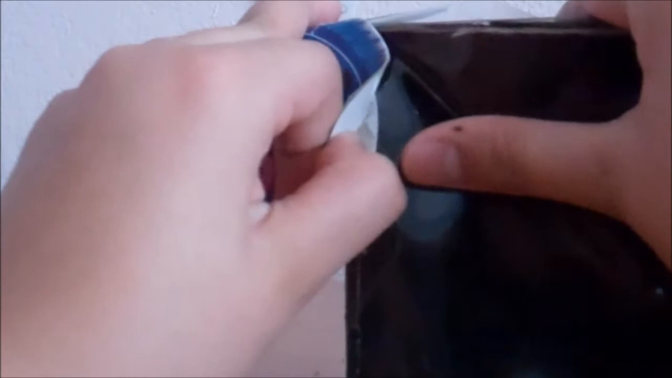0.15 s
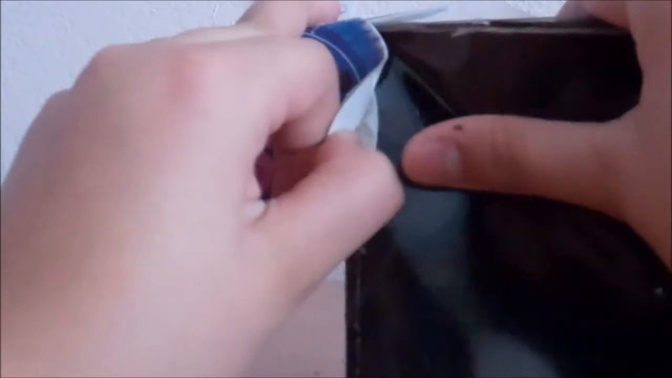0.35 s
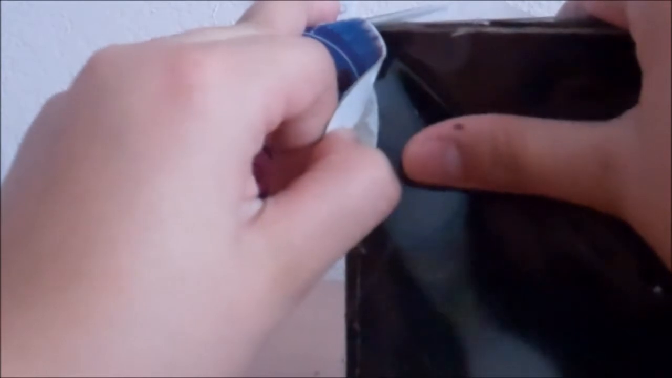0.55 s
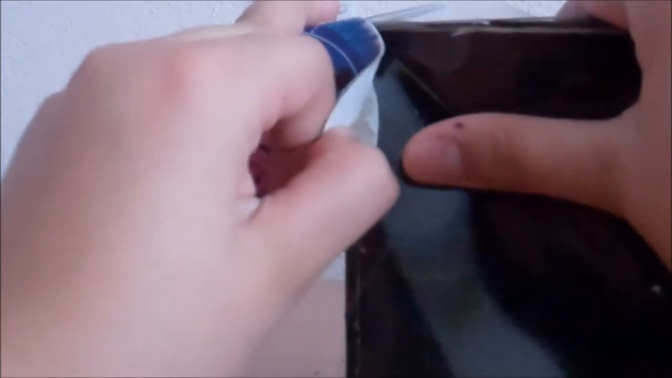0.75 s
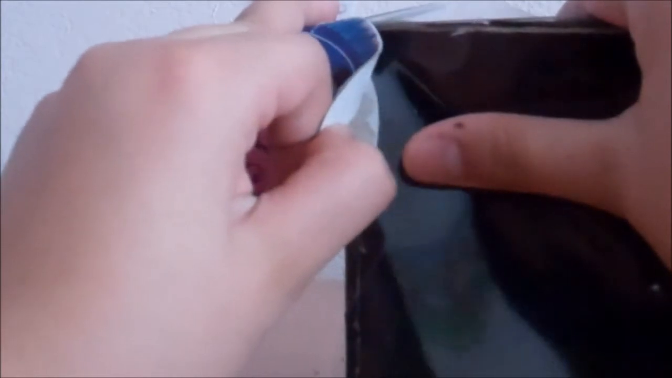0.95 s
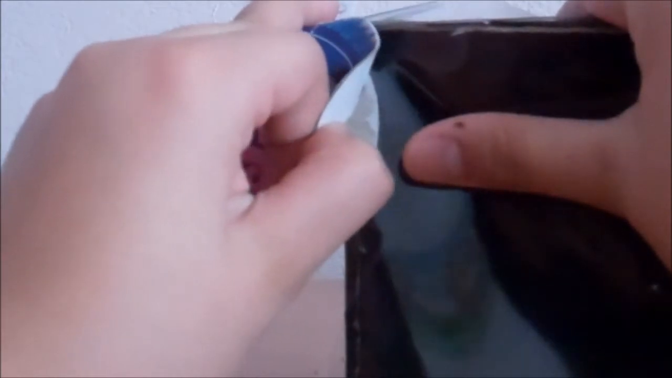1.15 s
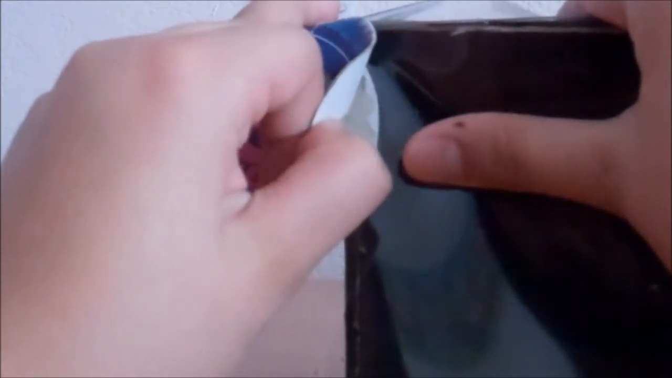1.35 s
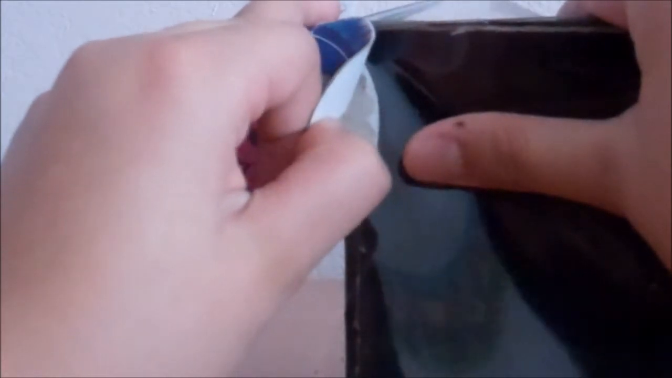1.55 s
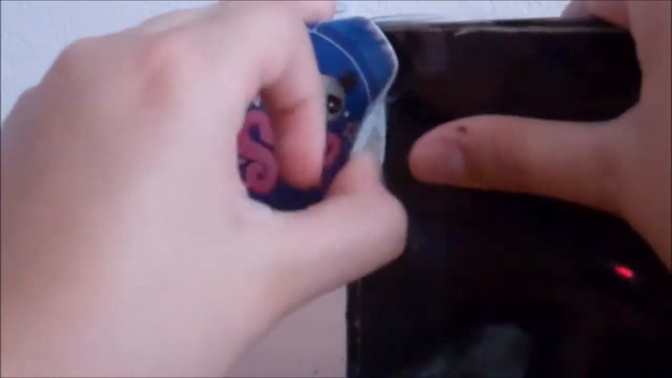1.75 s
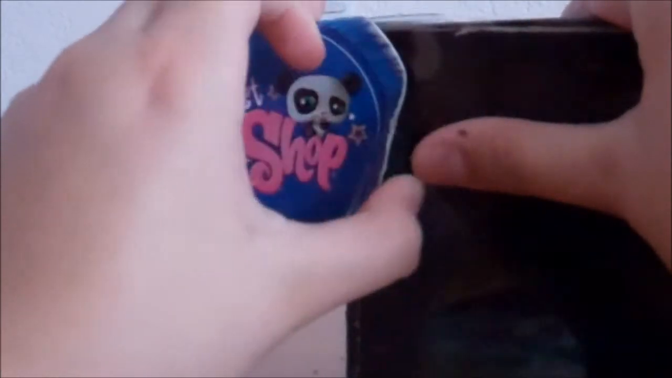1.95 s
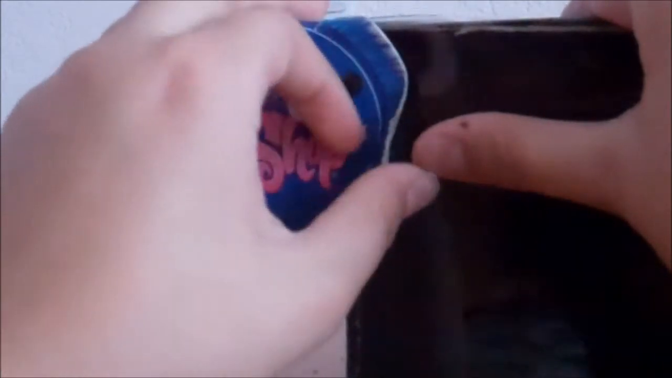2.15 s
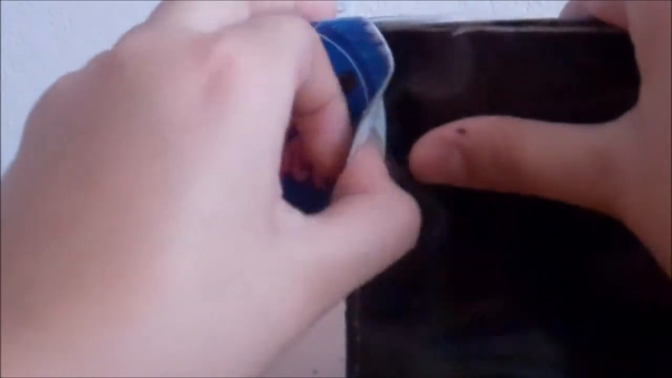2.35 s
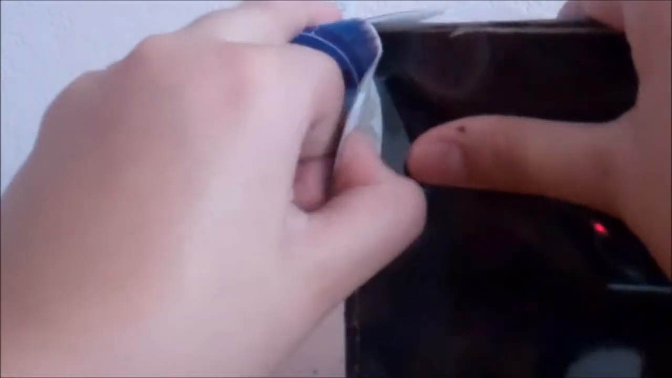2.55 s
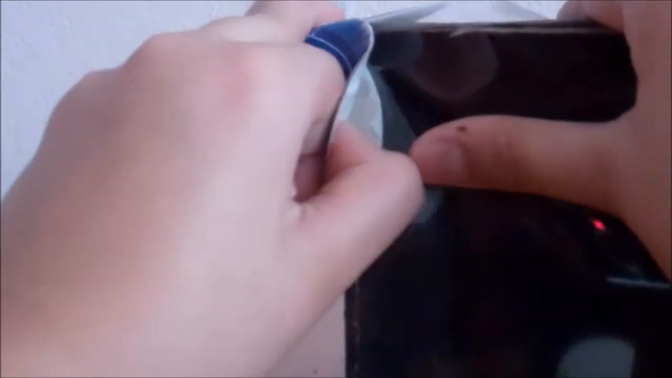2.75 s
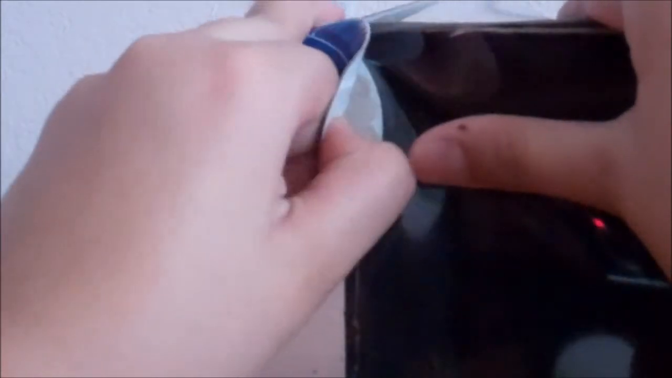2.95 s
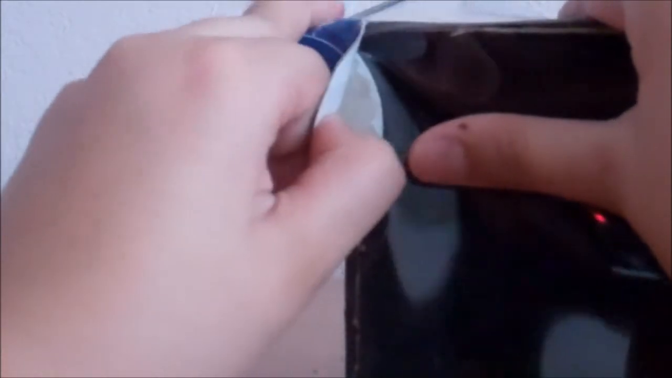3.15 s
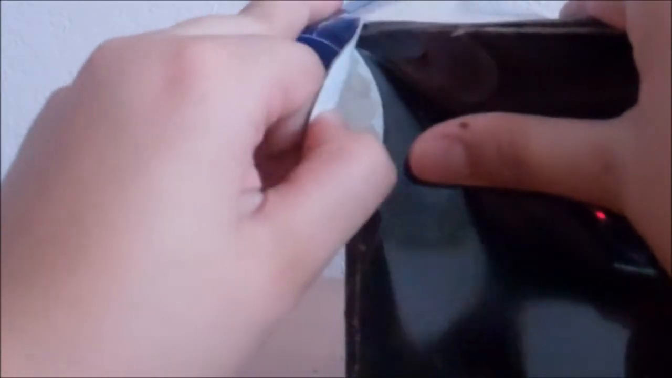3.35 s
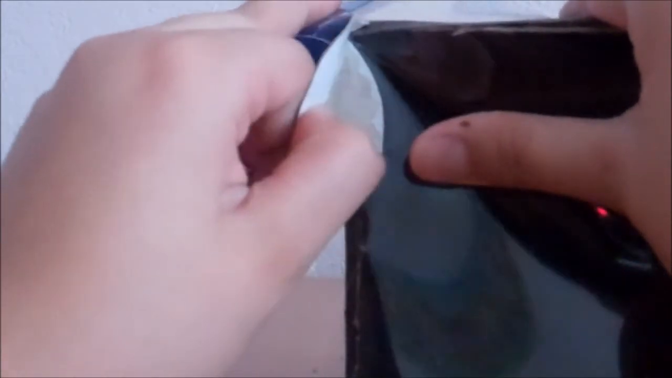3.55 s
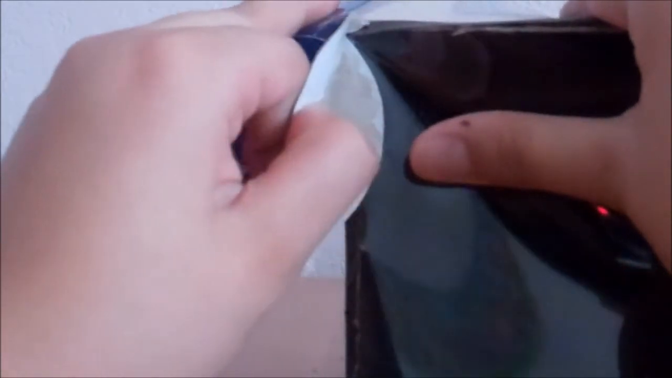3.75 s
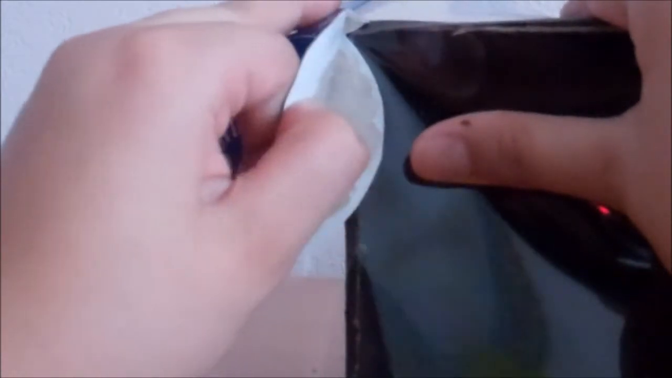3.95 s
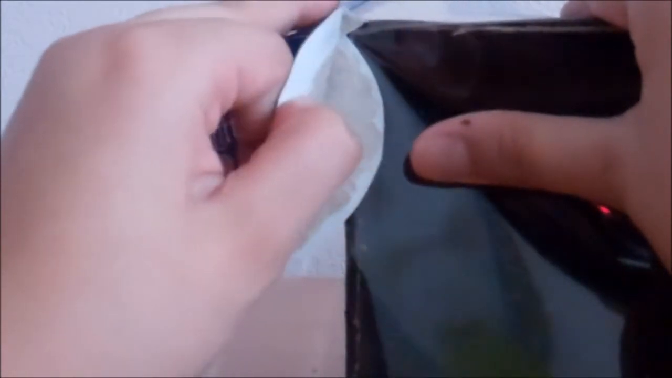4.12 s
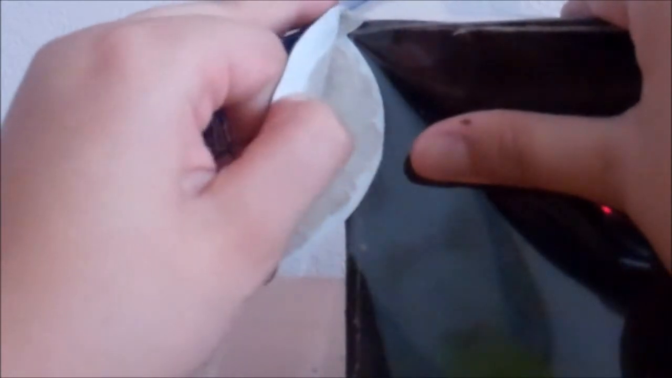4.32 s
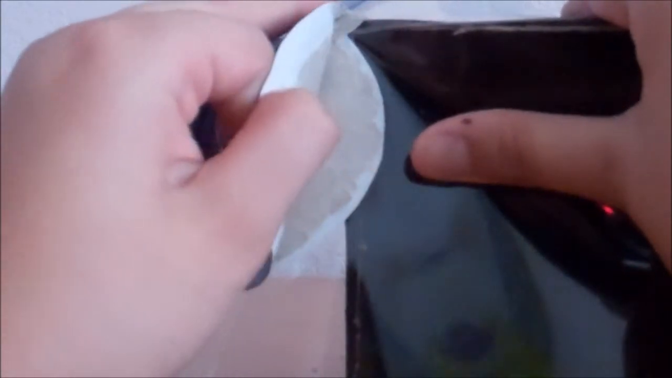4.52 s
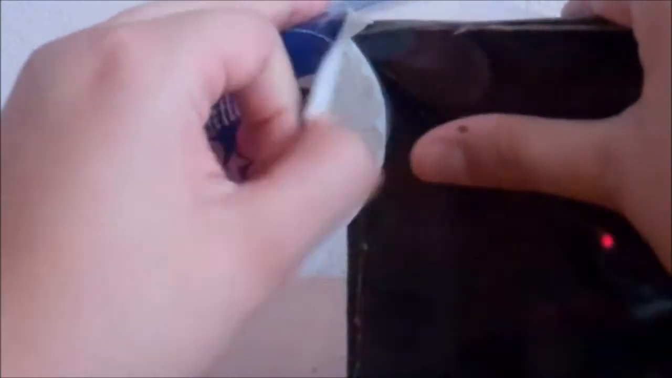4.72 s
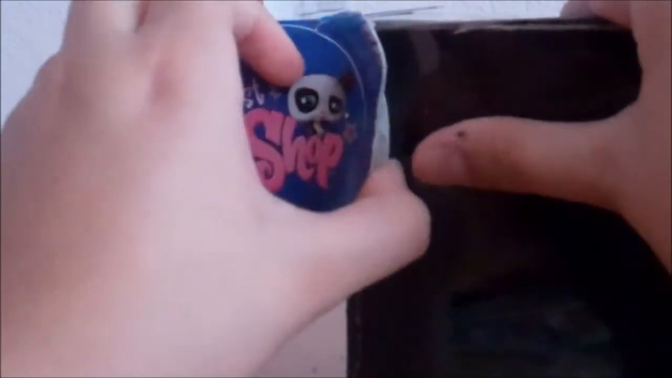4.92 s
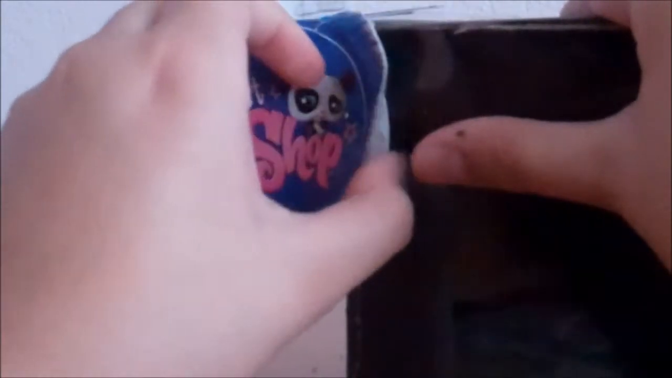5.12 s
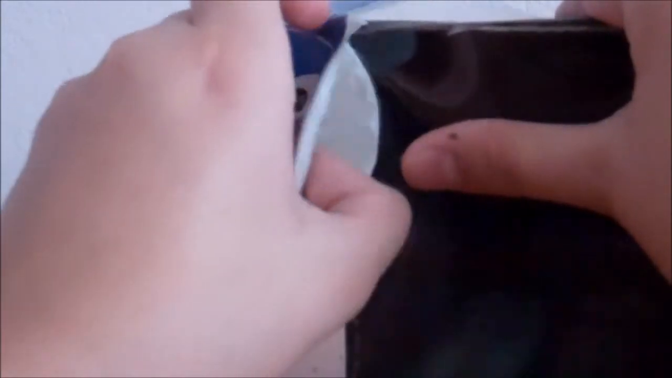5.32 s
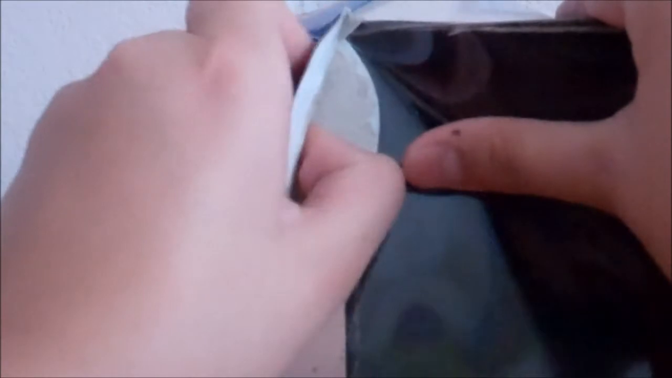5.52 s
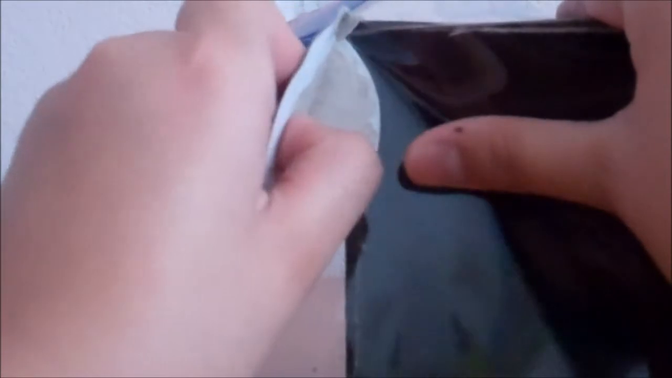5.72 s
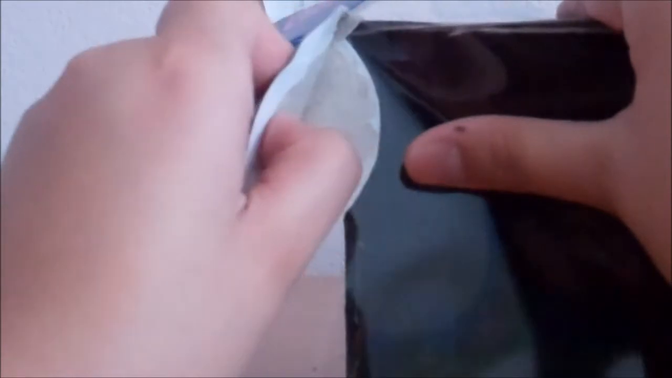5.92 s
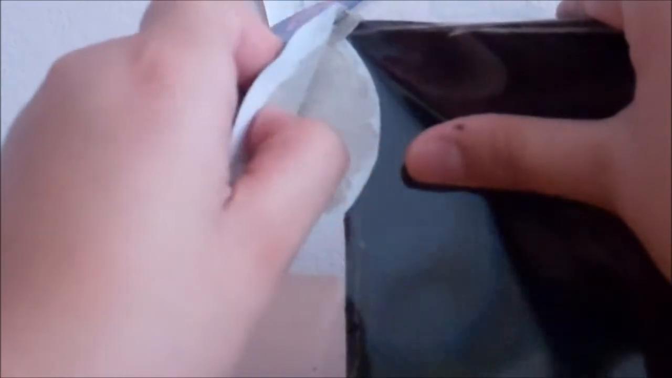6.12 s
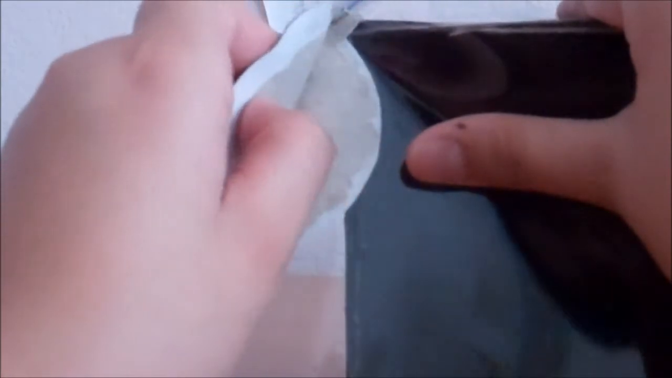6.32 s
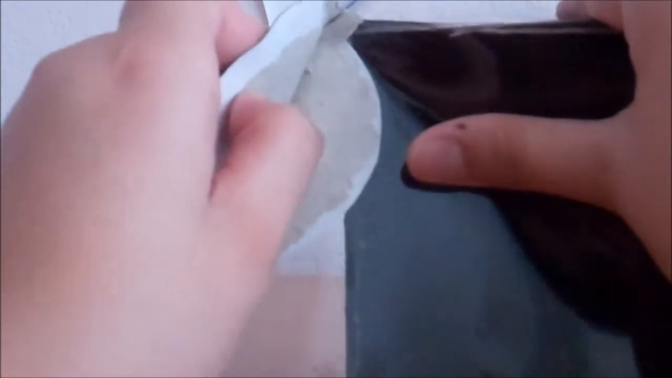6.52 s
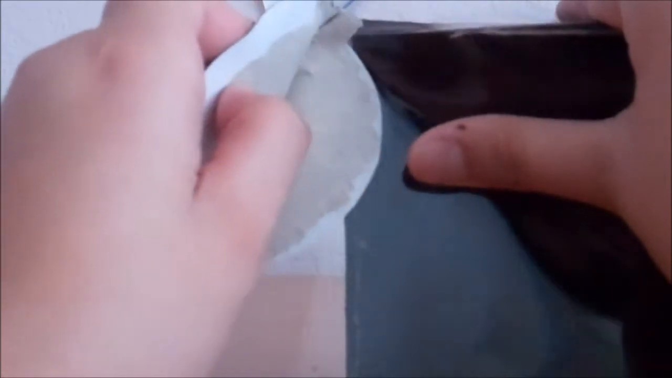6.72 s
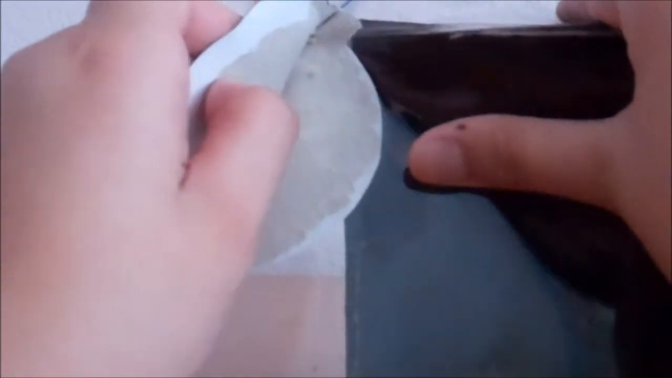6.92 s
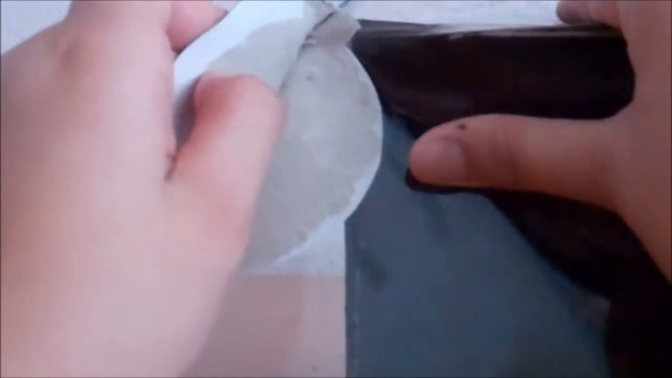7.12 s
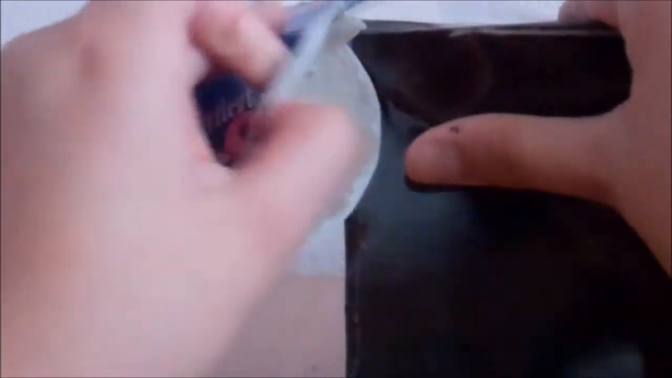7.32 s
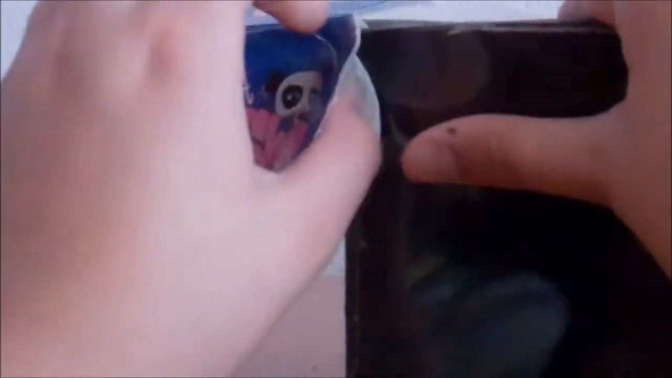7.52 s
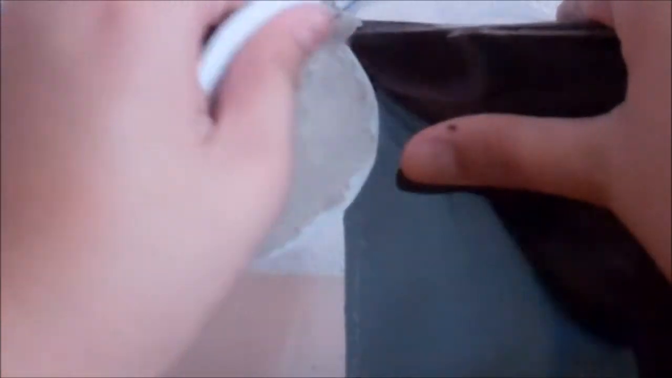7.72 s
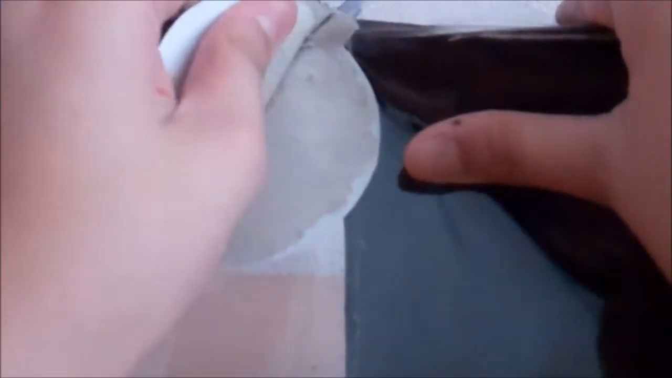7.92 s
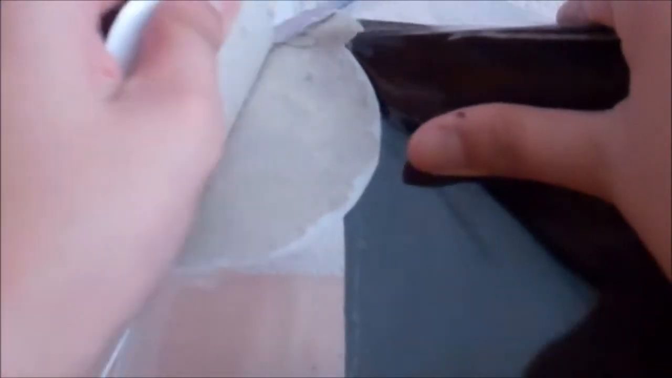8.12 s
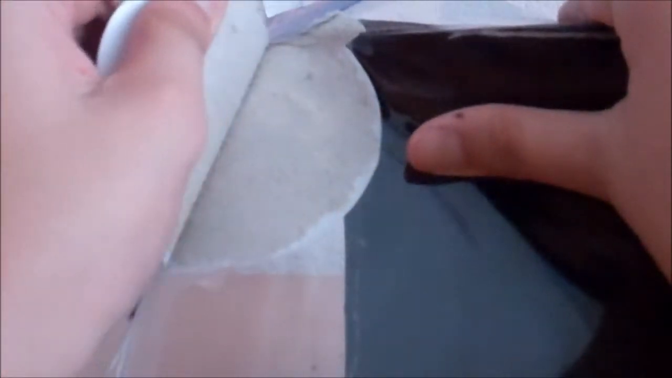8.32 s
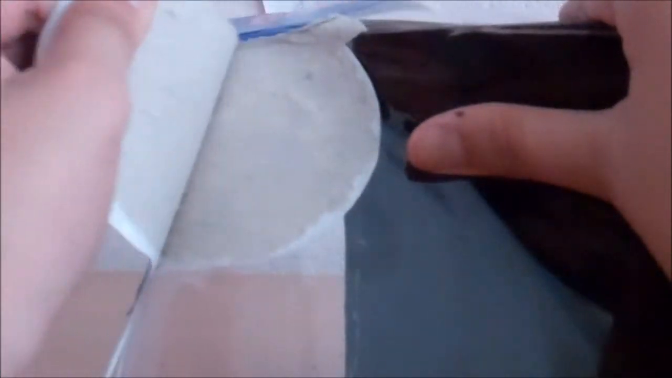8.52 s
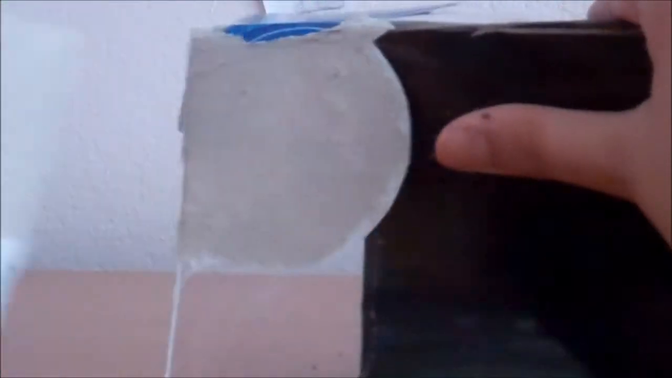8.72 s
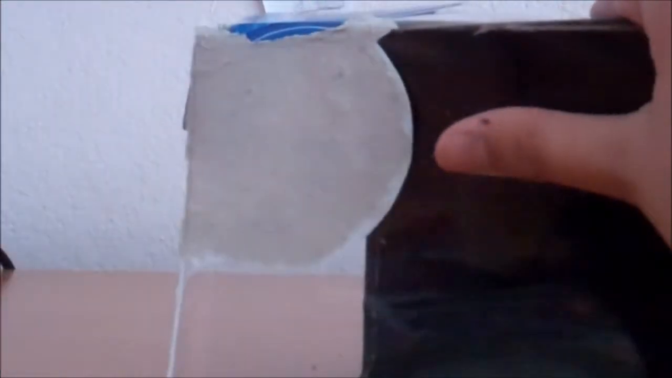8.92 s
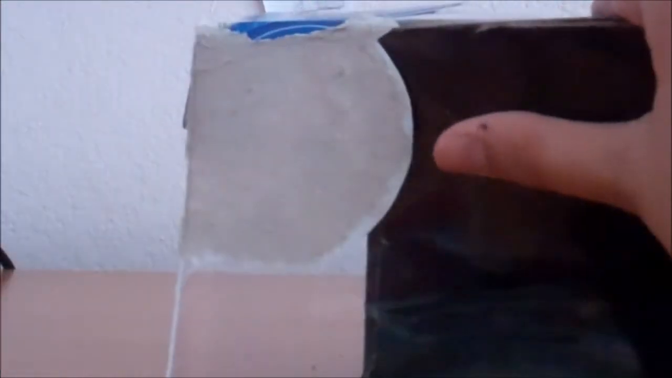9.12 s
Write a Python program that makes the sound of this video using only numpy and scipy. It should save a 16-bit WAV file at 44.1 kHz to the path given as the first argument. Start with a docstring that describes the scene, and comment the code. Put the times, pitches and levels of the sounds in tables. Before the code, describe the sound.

Crisp tearing of cardboard fibres, small irregular snaps over a thin papery rustle, runs in four long pulls separated by soft handling thumps on a hollow box. Fingers rub, a nail scuffs the plastic briefly, and the card creaks before the strongest rip near the end. Close, dry and slightly wide, with small-room reflections, quiet hiss and a low appliance hum behind.

```python
"""A glued cardboard sign is peeled off the stiff plastic window of a box, close to a small camera in a quiet room.
The tear is a dense crackle of filtered noise grains with a noise rustle; single fibre snaps are short cracks.
Knocks and creaking slips ring modes of box and card; friction grains ring them for rubbing fingers,
and ring the window for scrapes. Behind lie coloured room noise and the wavering hum of an appliance.
"""
import sys
import numpy as np
from scipy import signal
from scipy.fft import rfft, irfft
from scipy.io import wavfile
from scipy.ndimage import uniform_filter1d

SR = 44100
rng = np.random.default_rng(int(sys.argv[2]) if len(sys.argv) > 2 else 0)


def generate_wav(sig):
    """Save sig (samples, or channels by samples) to the path in sys.argv[1] as 16-bit PCM at SR."""
    pcm = np.round(np.clip(np.atleast_2d(sig).T, -1, 1) * 32767).astype(np.int16)
    wavfile.write(sys.argv[1], SR, pcm)


N = 404397
TIME = np.arange(N) / SR  # seconds


def undb(db):
    """Level law: decibels to an amplitude ratio."""
    return 10 ** (np.asarray(db) / 20)


def unit(x):
    """Normalisation to a root-mean-square amplitude of one."""
    return x / np.sqrt(np.mean(x ** 2))


def curve(table):
    """Linear interpolation in time of every column after the first."""
    s, *columns = np.transpose(table)
    return [np.interp(TIME, s, column) for column in columns]


def colour(x, points):
    """Minimum-phase filtering: the cepstrum of the log gain, folded to positive times, gives a causal response."""
    hz, db = np.transpose(points)
    log_grid = np.log(np.linspace(1, SR / 2, 4097))
    log_gain = np.interp(log_grid, np.log(hz), db) * np.log(10) / 20
    cepstrum = irfft(log_gain)
    cepstrum[1:4096] *= 2
    cepstrum[4097:] = 0
    response = irfft(np.exp(rfft(cepstrum)))[None, :4096]
    return signal.fftconvolve(x, response, axes=1)[:, :N]


def ring(x, modes, pitch=1):
    """Modal superposition: damped resonances, each applied twice, so the ring swells over a cycle or two and dies."""
    out = 0
    for hz, width_hz, db in modes:
        resonance = signal.iirpeak(pitch * hz, hz / width_hz, SR)
        once = signal.lfilter(*resonance, x)
        out = out + undb(db) * signal.lfilter(*resonance, once)
    return out


def pair(shape, alike):
    """Interchannel correlation: left and right noise share a middle part and oppose in a side part."""
    mid, side = rng.standard_normal((2,) + shape)
    alike = np.clip(alike, 0, 1)
    shared = np.sqrt(1 + alike) * mid
    opposed = np.sqrt(1 - alike) * side
    return np.array([shared + opposed, shared - opposed]) / np.sqrt(2)


def grains(rate, spread_db, decay_s, alike):
    """Shot noise: random clicks (rate per second) of uneven, bounded size, each smeared into a noise burst."""
    largest = 4.1  # bound on the exponential draw
    happens = rng.random(N) < rate / SR
    size = happens * undb(spread_db * np.minimum(rng.exponential(size=N), largest))
    burst = signal.lfilter([1], [1, -np.exp(-1 / (decay_s * SR))], size)
    return unit(burst * pair((N,), alike))


def swells(s, rise_s, hold_s, fall_s, *columns_db):
    """Power summation: events swell, hold and fade in straight dB lines, and their powers add to one level in dB."""
    t = TIME[::64, None]
    before = np.clip(s - t, 0, None) / rise_s
    after = np.clip(t - s - hold_s, 0, None) / fall_s
    power = undb(2 * -20 * (before + after))
    levels = [10 * np.log10(power @ undb(2 * db) + 1e-30) for db in columns_db]
    return [np.interp(TIME, t[:, 0], level) for level in levels]


def cracks(count, alike, envelope, clean=1):
    """Impulsive fracture: for every event one clean break inside a burst of noise."""
    crack = pair((count, len(envelope)), alike) * envelope
    crack /= np.sqrt(np.sum(crack ** 2, axis=2, keepdims=True))
    crack[..., np.argmax(envelope)] += clean
    return crack / np.sqrt(1 + clean ** 2)


def strikes(s, gain, shapes):
    """Superposition in time: one short shape at every event; gain is channels x events."""
    out = np.zeros((2, N + shapes.shape[-1]))
    for k, at in enumerate((s * SR).astype(int)):
        out[:, at:at + shapes.shape[-1]] += gain[:, k, None] * shapes[:, k]
    return out[:, :N]


# Spectrum of the room and microphone noise. Each row: frequency in Hz, relative density in dB per Hz.
AIR_SPECTRUM = [(12, -37), (20, 3.5), (54, -8.5), (123, 5), (212, -2), (265, 7), (321, -2), (434, 5.5),
                (862, -1.5), (1130, -4), (1760, -7.5), (2080, -5.5), (3800, -13.5), (6950, -13.5),
                (14200, -10.5)]
# Wavering and dipping of the background. Each row: time in seconds, reference (bass) level in dB.
BACKGROUND_LEVEL = [(0.0, -68), (3.1, -66), (4.6, -67.5), (5.4, -65.5), (6.4, -65.5), (6.7, -68),
                    (7.9, -65), (8.71, -72), (8.94, -77), (9.17, -63.5)]
# Lines of the hum. Each row: frequency in Hz, width in Hz of the wavering part, level in dB over the reference.
HUM_LINES = [(96.66, 6.06, -10), (119.2, 4.646, -2.5), (264.17, 4.3, 5.5)]
AIR_OVER_BASS_DB = 13.5
STEADY = 3.5  # steady part of each hum line over its wavering part


def background():
    """Diffuse-field coherence: room noise is alike in the bass and wide in the treble; the hum's lines waver."""
    low = signal.butter(2, 2500, fs=SR, output="sos")
    high = signal.butter(2, 2500, "high", fs=SR, output="sos")
    air = signal.sosfilt(low, pair((N,), 0.87)) + signal.sosfilt(high, pair((N,), 0.0979))
    noise = pair((N,), 0.99)
    hum = 0
    for hz, width_hz, db in HUM_LINES:
        waver = unit(ring(noise, [(hz, width_hz, 0)]))
        steady = STEADY * np.sin(2 * np.pi * hz * TIME)
        hum = hum + undb(db) * unit(steady + waver)
    level_db = curve(BACKGROUND_LEVEL)[0] + np.array([[.8], [-.8]])  # left, right
    return undb(level_db) * (undb(AIR_OVER_BASS_DB) * unit(colour(air, AIR_SPECTRUM)) + hum)


def room(x, t60_s, wet_db, alike):
    """Reverberation: exponentially decaying noise is the short diffuse tail of a small furnished room."""
    t = np.arange(int(.3 * SR)) / SR
    tail = pair(t.shape, alike) * np.exp(-np.log(1000) * t / t60_s) * (t > .003)
    tail = tail / np.sqrt(np.sum(tail ** 2) / 2)
    return x + undb(wet_db) * signal.fftconvolve(x, tail, axes=1)[:, :N]


# Strokes of fingers and card over the box. Each row: peak in seconds, rise and fall in seconds per 20 dB,
# then relative levels of box, card and window in dB.
STROKE_EVENTS = [(1.65, 0.0502, 0.25, -41, -50, -62), (1.699, 0.0524, 0.098, -46.5, -55.5, -48.5),
                 (1.78, 0.12, 0.055, -50, -47.5, -60), (1.87, 0.04786, 0.1, -43, -43.5, -52),
                 (2.1, 0.33, 0.1918, -47, -48, -74.5), (2.233, 0.018, 0.036, -33.5, -51, -69.5),
                 (2.421, 0.13, 0.11, -32, -31.5, -61.5), (2.54, 0.1022, 0.08, -48, -55, -39),
                 (3.494, 0.1223, 0.2669, -61, -64.5, -47.5), (4.675, 0.02394, 0.2767, -42, -45, -48.5),
                 (4.858, 0.1231, 0.08718, -36, -38.5, -63), (5.28, 0.19, 0.197, -38.5, -39, -53),
                 (5.34, 0.016, 0.093, -32.5, -34.5, -42), (5.344, 0.008, 0.022, -50, -40, -24.5),
                 (5.586, 0.2372, 0.0507, -46.5, -49, -71), (6.93, 0.1629, 0.2963, -52, -66, -70),
                 (7.248, 0.02997, 0.1555, -40, -46.5, -71), (7.487, 0.11, 0.2, -43.5, -42.5, -41),
                 (7.605, 0.11, 0.066, -46.5, -53, -37), (7.66, 0.03, 0.05, -50, -55, -37),
                 (7.69, 0.093, 0.04, -43, -47, -36), (7.9, 0.1, 0.22, -44.5, -60.5, -70.5),
                 (8.02, 0.03224, 0.23, -42, -58, -49), (8.12, 0.0916, 0.0577, -59.5, -66.5, -46.5),
                 (8.62, 0.22, 0.1, -53, -52, -45.5), (8.722, 0.14, 0.051, -39, -40.5, -44.5),
                 (8.944, 0.08945, 0.03892, -47, -52.5, -56), (9.02, 0.102, 0.2995, -59, -64, -77)]


def stroke_gains():
    """Envelope control: the strokes set the gains of box, card and window."""
    s, rise_s, fall_s, *levels_db = np.transpose(STROKE_EVENTS)
    return undb(swells(s, rise_s, 0, fall_s, *levels_db))


# Modes of the plastic window. Each row: frequency in Hz, width in Hz of one pass, relative level in dB.
WINDOW_MODES = [(2170, 350, -3.5), (2550, 370, 0.5), (3000, 370, -1), (3330, 420, -2)]
# Higher modes rung by a nail. Each row: frequency in Hz, width in Hz of one pass, relative level in dB.
NAIL_MODES = [(4920, 700, 1.5), (5560, 640, -1), (6900, 1200, -6)]
# Bright scuffs of a nail on the plastic. Each row: start of full strength in seconds, hold in seconds,
# swell and fade in seconds per 20 dB, level in dB.
NAIL_SCUFFS = [(1.958, 0.0073, .01, -53.5), (2.02, .04, .04, -58), (2.1, 0.034, .02, -47.5),
               (5.084, .09, 0.2, -58.5)]


def scrape(gain):
    """Friction excitation: fine grains ring the plastic window; a nail rings it higher."""
    grit = grains(2000.0, 2.6, 0.0007, 0.92)
    s, hold_s, edge_s, db = np.transpose(NAIL_SCUFFS)
    nail_gain = undb(swells(s, edge_s, hold_s, edge_s, db)[0])
    nail = nail_gain * unit(ring(grit, NAIL_MODES))
    return undb(-4.5) * unit(ring(grit, WINDOW_MODES)) * gain + nail


FLEX, FLEX_PER_S = .07, 14  # log-speed depth before smoothing, new bends per second: the grip bends the modes


def flex(x):
    """Frequency modulation: reading a steady sound at a wandering speed slides its resonances up and down."""
    hold = int(SR / FLEX_PER_S)
    steps = np.repeat(rng.standard_normal(N // hold + 1), hold)
    bend = uniform_filter1d(steps, hold // 2)[:N]
    at = np.cumsum(np.exp(FLEX * bend)) % (N - 1)
    return unit(np.array([np.interp(at, np.arange(N), channel) for channel in x]))


# Hollow of the box, also played by the knocks. Each row: frequency in Hz, width in Hz of one pass, level in dB.
HOLLOW_MODES = [(441, 81, -2.5), (527, 202, -2.5)]
# Deep modes of the box walls, also knocked. Each row: frequency in Hz, width in Hz of one pass, level in dB.
WALL_MODES = [(187.4, 71, -0.5), (325.5, 48, 1)]
# Modes of the card, also knocked. Each row: frequency in Hz, width in Hz of one pass, level in dB.
CARD_MODES = [(827, 270, -9), (1100, 350, -0.5), (1537, 350, -6), (2230, 550, -9.5)]


def rub(box_gain, card_gain):
    """Stick-slip friction: skin pushes densely and unevenly into the modes of box and card."""
    pushes = grains(1200., 2.3, 0.0011, 0.97)
    box = flex(ring(pushes, HOLLOW_MODES)) + undb(-5.5) * flex(ring(pushes, WALL_MODES))
    card = flex(ring(pushes, CARD_MODES))
    return undb(np.array([[-2.2], [-3.8]])) * (box_gain * box + card_gain * card)


# Creaks, runs of slips of the bent card. Each row: first slip in seconds, last slip in seconds,
# gap between slips in seconds, mean level in dB, central pitch in Hz.
CREAK_RUNS = [(6.845, 6.932, .0143, -39, 500), (6.951, 6.971, .0095, -36, 515),
              (7.031, 7.066, .0175, -35, 535), (7.101, 7.145, .0215, -33, 507),
              (7.855, 7.945, .0113, -36, 520), (7.961, 8.012, .017, -33, 530)]
SLIP_DEEP_DB, SLIP_CARD_DB = -14, -9  # mean levels of wall and card modes, relative
SLIP_COLOUR_DB, SLIP_SPREAD_DB = 3, 2.3  # standard deviations of those levels and of strength
SLIP_JITTER_S, SLIP_DETUNE = 0.0009, .05  # standard deviations of time and of log pitch


def slips():
    """Stick-slip relaxation: a creak's slips come nearly evenly, uneven in strength, colour and pitch; knock rows."""
    runs = [(np.arange(first, last + gap / 2, gap), level, hz) for first, last, gap, level, hz in CREAK_RUNS]
    s, db, hz = np.hstack([[run, level + 0 * run, hz + 0 * run] for run, level, hz in runs])
    late, strong, deep, card, sharp = rng.standard_normal((len(s), 5)).T
    return np.transpose([s + SLIP_JITTER_S * late,
                         db + SLIP_SPREAD_DB * strong,
                         SLIP_DEEP_DB + SLIP_COLOUR_DB * deep,
                         SLIP_CARD_DB + SLIP_COLOUR_DB * card,
                         hz * np.exp(SLIP_DETUNE * sharp)])


# Single knocks on the box. Each row: time in seconds, level in dB, relative level of the wall modes in dB,
# relative level of the card modes in dB, pitch of the hollow in Hz.
BOX_KNOCKS = [(0.431, -38, -20.5, -2, 437), (0.798, -41, -21, -16.5, 427), (1.665, -35, -19.5, -10, 428),
              (1.686, -32.5, -24.5, 0, 433), (2.2202, -37.5, -5, 21, 497), (2.234, -34, -14, -6, 452),
              (2.423, -24.5, -10, 1, 507), (2.446, -29.5, -30, 3, 410), (3.291, -47, -15, 9, 437),
              (3.534, -43, -8, 10, 440), (3.861, -44, -4, 2, 440), (4.385, -41, -24, -3, 497),
              (4.669, -38, -2, -2, 560), (4.716, -36.5, -4, 5.5, 466), (4.832, -31, 2, 5, 400),
              (4.848, -23.5, -23.5, -17, 437), (4.855, -26.5, -3, -7, 440), (4.904, -33, -10.5, 2, 490),
              (5.257, -34.5, -21.5, -15, 423), (5.34, -19.5, -10, 1, 415), (5.35, -25, -34, -17, 525),
              (6.132, -41.5, -12.5, -2, 480), (6.179, -39.5, -4, -18.5, 477), (6.256, -40.5, -3, 2.5, 480),
              (6.352, -37.5, -7, -7.5, 480), (6.511, -41.5, -1.5, -20, 477), (6.573, -41, -8.5, -12.5, 477),
              (7.245, -36, 2, 3, 550), (7.27, -38.5, -12, -15, 440), (7.42, -36, -21, -9, 436),
              (7.453, -45, -18, 11, 440), (7.476, -29.5, -18, -1.5, 423), (7.5, -34.5, -28, -9.5, 433),
              (8.358, -38.5, -5.5, -8, 557), (8.932, -39.5, -9, -14, 423), (9.045, -46.5, -11.5, -5, 444)]
SLIP_WIDTH_HZ, CARD_DETUNE = 175, 0.056  # width of the one hollow mode a slip rings, spread of the card's log pitch


def knocks():
    """Impact excitation: a soft push rings the box, pitched by the grip; its sharper edge rings the card."""
    rows = np.vstack([BOX_KNOCKS, slips()])
    hollow_hz = HOLLOW_MODES[0][0]
    slip_modes = [(hollow_hz, SLIP_WIDTH_HZ, 0)]
    t = np.arange(3072) / SR
    push = np.tile(t / 0.00034 * np.exp(-t / 0.00022), (2, 1))
    edge = cracks(len(rows), .95, np.exp(-t / .0009), clean=1.8)
    bend = np.exp(CARD_DETUNE * rng.standard_normal(len(rows)))
    shapes = []
    for k, (deep_db, card_db, hz) in enumerate(rows[:, 2:]):
        modes = HOLLOW_MODES if k < len(BOX_KNOCKS) else slip_modes
        hollow = undb(30) * ring(push, modes, hz / hollow_hz)
        walls = undb(deep_db + 29.0) * ring(push, WALL_MODES)
        card = undb(card_db + 34.0) * ring(edge[:, k], CARD_MODES, bend[k])
        shapes.append(hollow + walls + card)
    gain = undb(rows[:, 1] + np.array([[.8], [-.8]]))
    return strikes(rows[:, 0], gain, np.stack(shapes, axis=1))


# Single loud fibre snaps. Each row: peak in seconds, level in dB, relative level of the middle band in dB.
FIBRE_SNAPS = [(0.0263, -23.5, -18), (0.0917, -27.5, -11), (0.1406, -25.5, -17.5), (0.316, -26, -16.5),
               (0.3666, -25.5, -21), (0.4314, -27, -14), (0.4538, -23, -17), (0.5092, -20.5, -16),
               (0.512, -20.5, -19), (0.581, -21.5, -15.5), (0.584, -21, -17), (0.614, -29, -17),
               (0.6195, -29, -22), (0.706, -14.5, -21.5), (0.7407, -27, -22), (0.7692, -27, -24),
               (0.7946, -27, -18), (0.8065, -25, -22), (0.811, -23, -20), (0.8144, -24, -11),
               (0.8515, -27, -18), (0.8617, -22, -17), (0.8782, -21.5, -24.5), (0.8855, -26, -20),
               (0.9098, -26, -18), (0.9262, -27, -18), (0.9425, -21, -16), (0.9837, -30, -24),
               (1.0306, -26.5, -22), (1.0538, -17, -24.5), (1.0704, -11.5, -28), (1.0897, -23, -25.5),
               (1.168, -19.5, -13), (1.1873, -21, -20), (1.214, -19, -19), (1.2419, -23.5, -11),
               (1.3064, -28, -20), (1.3574, -19, -24), (1.3602, -17.5, -22), (1.37, -19, -19.5),
               (1.5095, -27, -11.5), (1.687, -29.5, -6.5), (2.2203, -23.5, -0.5), (2.4255, -17.5, -5),
               (2.492, -24, -29), (2.6104, -15.5, -18), (2.6717, -23, -21), (2.6904, -14, -19),
               (2.7077, -27, -20), (2.724, -22.5, -13.5), (2.9956, -28, -18), (3.0305, -27, -17),
               (3.1214, -26, -19.5), (3.1269, -21, -18), (3.4139, -23, -13), (3.4555, -28.5, -14),
               (3.492, -24, -11), (3.498, -26, -11), (3.5337, -21, -12), (3.718, -28, -18),
               (3.8433, -16, -16.5), (3.8943, -19, -16.5), (4.0726, -16.5, -13.5), (4.2333, -24, -15),
               (4.2513, -18, -16), (4.2902, -23, -18), (4.304, -24, -15), (4.344, -26, -12),
               (4.388, -26, -11), (4.4443, -29, -18), (4.456, -23, -12), (4.4807, -26, -18),
               (4.5057, -27, -18), (4.522, -20, -14), (4.563, -25, -18), (4.5789, -25, -17),
               (4.612, -31, -14), (4.9031, -26, -11), (4.9164, -28, -4), (5.3416, -17.5, -12),
               (5.3436, -16.5, 0), (5.3453, -22, -3), (5.5196, -24.5, -7), (5.658, -25, -19),
               (5.6836, -20.5, -13.5), (5.7281, -21, -15), (5.7698, -21.5, -22), (5.8064, -21.5, -18),
               (5.865, -19.5, -12), (5.94, -22.5, -9), (5.9628, -27, -18), (5.987, -26, -18),
               (6.0027, -18, -18), (6.067, -24.5, -11), (6.157, -24.5, -12), (6.207, -23, -16),
               (6.211, -24.5, -10), (6.24, -15, -20), (6.2764, -20.5, -12), (6.319, -17, -14),
               (6.3262, -27, -11), (6.3774, -27, -20), (6.4063, -23, -16), (6.454, -27, -15.5),
               (6.459, -15.5, -16.5), (6.469, -24, -24), (6.4886, -19, -13.5), (6.5066, -23, -20),
               (6.541, -29, -20), (6.5655, -28, -22), (6.5765, -24, -22), (6.5919, -16.5, -21),
               (6.5964, -22.5, -10.5), (6.688, -12, -22.5), (6.7291, -26, -18), (6.801, -23, -20),
               (6.849, -15, -18), (6.8925, -13.5, -12), (6.9785, -26, -18), (6.9855, -23, -21),
               (6.997, -18.5, -16), (7.2459, -19, -8), (7.477, -28, -3.5), (7.8657, -20, -11.5),
               (7.895, -27, -14), (7.9947, -25, -18), (8.014, -15, -22.5), (8.025, -5.5, -14),
               (8.0621, -17, -12), (8.0695, -15, -17), (8.0882, -13, -14), (8.3043, -23.5, -21),
               (8.3385, -26, -22), (8.3783, -25, -10), (8.4345, -24, -24.5), (8.4429, -22, -28.5),
               (8.514, -26, -15), (8.6144, -17, -16), (8.6906, -23, -6), (8.708, -23, -6)]
# Treble of a tear, also played by the peel. Each row: frequency in Hz, relative density in dB per Hz.
TEAR_SPECTRUM = [(2940, -58), (5000, -26.5), (5550, -26.5), (7840, -14), (8940, -14.5), (13800, -3.5),
                 (14300, -9)]
# Middle band of a tear, also played by the peel. Each row: frequency in Hz, relative density in dB per Hz.
SHEET_SPECTRUM = [(470, -27.5), (800, -5.5), (1130, 3), (1660, 1.5), (2030, 3.5), (3370, 5), (4010, 3.5),
                  (6500, 2.5), (8450, 2), (14300, -120)]
# Where the tear runs, also played by the peel. Each row: time in seconds, left minus right in dB.
TEAR_PAN = [(0.0, 0.4412), (3.06, 0.1873), (5.54, 1), (8.12, 0.2), (9.17, 0.7384)]


def snaps():
    """Brittle fracture: a crack gathers and dies within a millisecond; a rattle follows, longer in the middle band."""
    s, db, mid_db = np.transpose(FIBRE_SNAPS)
    lead_s = .001
    t = np.arange(384) / SR - lead_s
    rattle = undb(-16) * np.exp(-t / .0012)
    sharp = np.where(t < 0, np.exp(t / .0001), np.exp(-t / .00016) + rattle)
    broad = np.where(t < 0, np.exp(t / .0003), np.exp(-t / .0015))
    pan_db = np.interp(s, *np.transpose(TEAR_PAN)) + 1.982 * rng.standard_normal(len(s))
    gain = undb(db + np.array([pan_db, -pan_db]) / 2)
    top_cracks = cracks(len(s), 0.089, sharp, clean=2.2)
    top = colour(strikes(s - lead_s, gain, top_cracks), TEAR_SPECTRUM)
    middle_cracks = cracks(len(s), 0.63, broad, clean=0.29)
    middle = colour(strikes(s - lead_s, gain * undb(mid_db), middle_cracks), SHEET_SPECTRUM)
    return undb(23) * top + undb(17) * middle


# Pulls and tugs on the card. Each row: start of full strength in seconds, hold in seconds,
# swell and fade in seconds per 20 dB, relative treble level in dB, middle band relative to the treble in dB.
CARD_PULLS = [(0.0, 0.0592, 0.44, -45.5, -10), (0.34, 0.37, 0.1, -46, -11.5),
              (0.811, 0.57, 0.1, -43.5, -13), (1.422, 0.1, 0.5061, -50.5, -10),
              (1.69, 0.003474, 0.07, -43, -7.5), (1.878, 0.0034, 0.04, -44, -6),
              (2.108, 0.018, 0.2, -50.5, -2.5), (2.252, 0.098, 0.6, -56, -4),
              (2.41, 0.004095, 0.14, -45, -0.5), (2.522, 0.008, 0.025, -39.5, -5),
              (2.545, 0.018, 0.05, -47, -5.5), (2.596, 0.16, 0.24, -49, -10.5),
              (2.993, 0.0061, 0.06, -40.5, -11.5), (3.139, 0.092, 0.64, -48.5, -9.5),
              (3.492, 0.0045, 0.23, -38, -10.5), (3.772, 0.34, 0.25, -45, -10),
              (4.223, 0.35, 0.14, -44.5, -10.5), (4.529, 0.00553, 0.03, -37.5, -11),
              (4.723, 0.0042, 0.02, -41, -6), (4.835, 0.003274, 0.0454, -39.5, -3),
              (5.163, 0.03476, 0.2522, -59, -7), (5.262, 0.00487, 0.25, -46.5, -1.5),
              (5.352, 0.00499, 0.0119, -38, -11), (5.505, 0.00545, 0.14, -41, -7),
              (5.576, 0.00445, 0.17, -43, -6.5), (5.67, 0.21, 0.05, -40, -11.5),
              (5.982, 0.13, 0.07, -43, -10.5), (6.203, 0.5, 0.0981, -41.5, -11.5),
              (6.865, 0.15, 0.25, -39, -14), (7.084, 0.095, 0.0027, -43.5, -14),
              (7.27, 0.47, 0.12, -47.5, -4.5), (7.675, 0.0063, 0.3237, -42.5, -8),
              (7.876, 0.109, 0.19, -42.5, -11), (8.083, 0.045, 0.08, -33.5, -10.5),
              (8.347, 0.31, 0.05, -40.5, -9.5), (8.649, 0.06, 0.06, -36, -7),
              (8.927, 0.1966, 0.0209, -69.5, 2)]
RIP_S, RIP_PATCHY = 8.07, .45  # from here (s) the card comes off fast, with this share of the unevenness


def peel():
    """Granular fracture: fibres let go in patches; duller sound is more the sheet's even rustle, as is the fast rip."""
    s, hold_s, edge_s, db, rel_db = np.transpose(CARD_PULLS)
    top_db, mid_db = swells(s, edge_s, hold_s, edge_s, db, db + rel_db)
    mid_db = mid_db - top_db
    pan_db = curve(TEAR_PAN)[0]
    hold = int(SR / 90)
    steps = np.repeat(rng.standard_normal(N // hold + 1), hold)
    slow = np.interp(TIME, [RIP_S - .05, RIP_S], [1, RIP_PATCHY])
    patches = undb(slow * 2.55 * uniform_filter1d(steps, hold)[:N])
    fibres = unit(patches * grains(2200.0, 4.7, .00017, 0.54))
    rustle = patches * unit(pair((N,), 0.58))
    flutter = patches * unit(pair((N,), 0.58))
    even = np.clip((mid_db + 11) / 8, 1.25 - slow, 1)  # power share of the rustle
    source = np.sqrt(1 - even) * fibres + np.sqrt(even) * rustle
    treble = unit(colour(source, TEAR_SPECTRUM))
    middle = undb(mid_db + 0.57) * unit(colour(fibres + 1.8 * flutter, SHEET_SPECTRUM))
    return undb(top_db + 2.1 + np.array([pan_db, -pan_db]) / 2) * (treble + middle)


THIN_BELOW_HZ = 110  # small objects radiate little bass


def scene():
    """Superposition: the near sources share the room's tail and lose their bass; the background is added."""
    box, card, window = stroke_gains()
    near = peel() + snaps() + knocks() + rub(box, card) + scrape(window)
    near = room(near, t60_s=0.11, wet_db=-13, alike=0.8)
    thin = signal.butter(2, THIN_BELOW_HZ, "high", fs=SR, output="sos")
    return signal.sosfilt(thin, near) + background()


SHELF_HZ, TOP_HZ = 14250, 15550  # edges of the two treble steps


def record(dry):
    """Saturation and band limiting: the camera rounds the loudest peaks and drops the highest treble in two steps."""
    ceiling = .6
    rounded = ceiling * np.tanh(dry / ceiling)
    shelf = signal.ellip(6, .5, 32, SHELF_HZ, fs=SR, output="sos")
    top = signal.ellip(8, .2, 70, TOP_HZ, fs=SR, output="sos")
    return signal.sosfilt(top, signal.sosfilt(shelf, rounded))


dry = scene()
out = record(dry)
generate_wav(out)
```